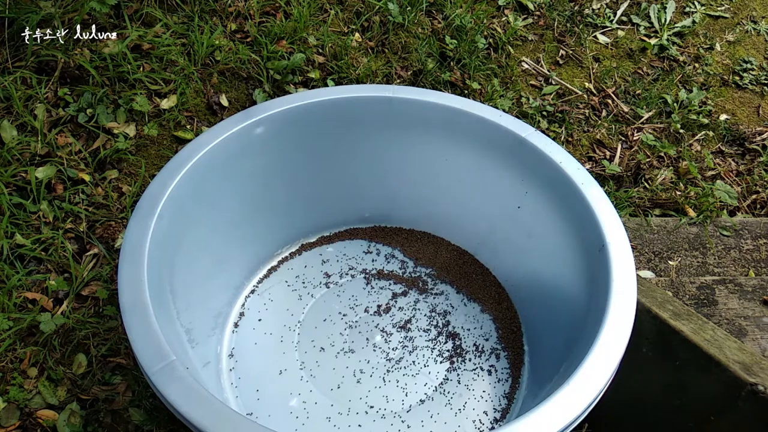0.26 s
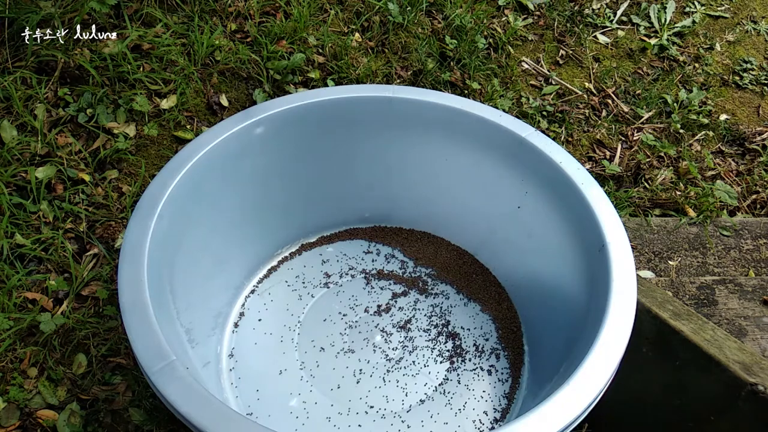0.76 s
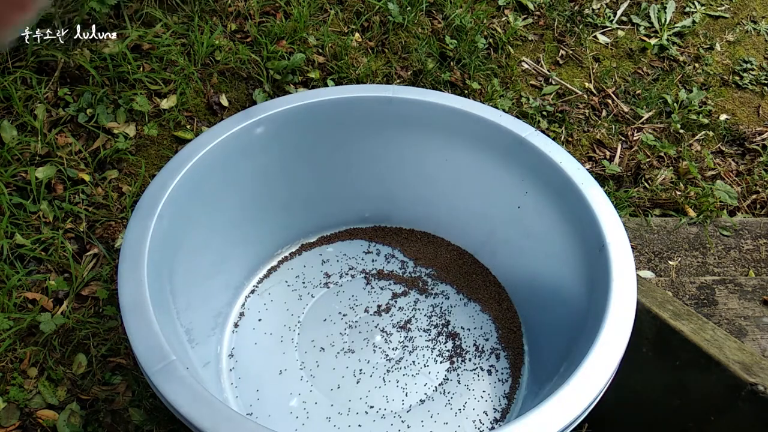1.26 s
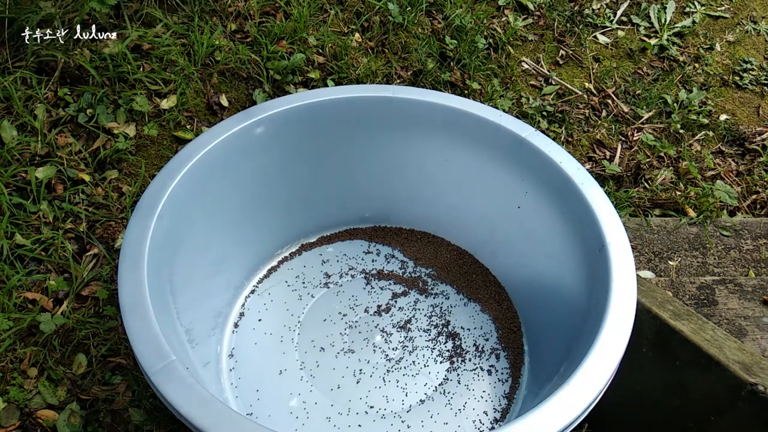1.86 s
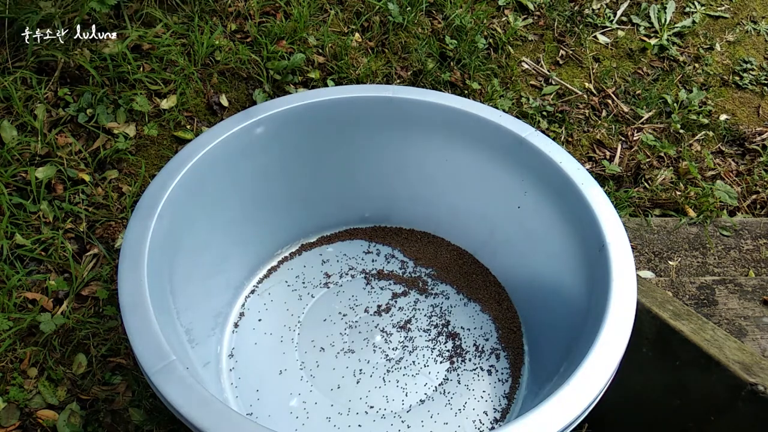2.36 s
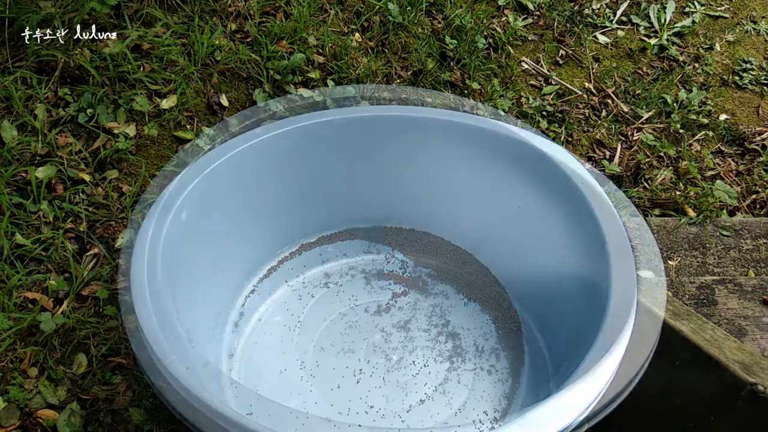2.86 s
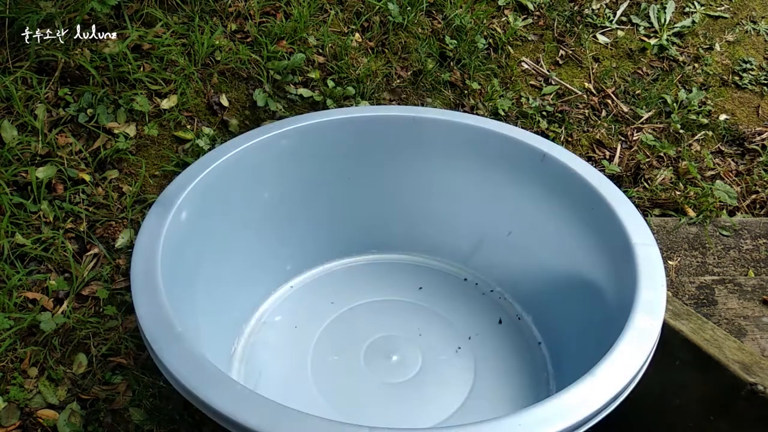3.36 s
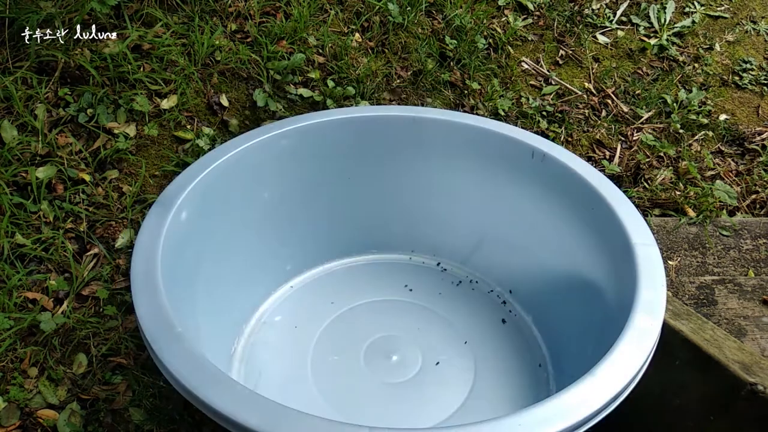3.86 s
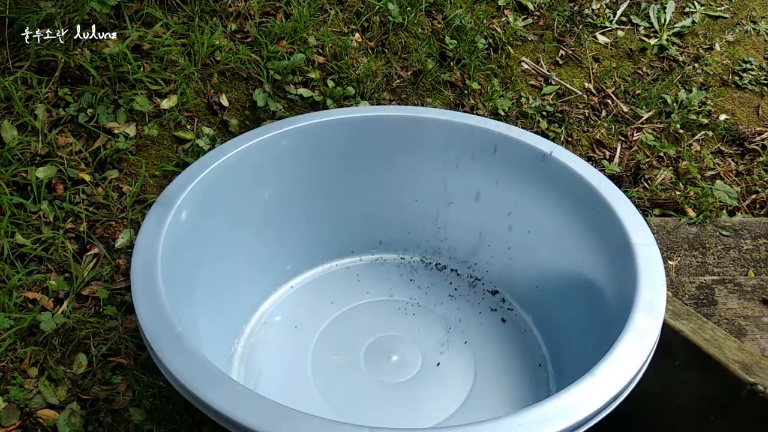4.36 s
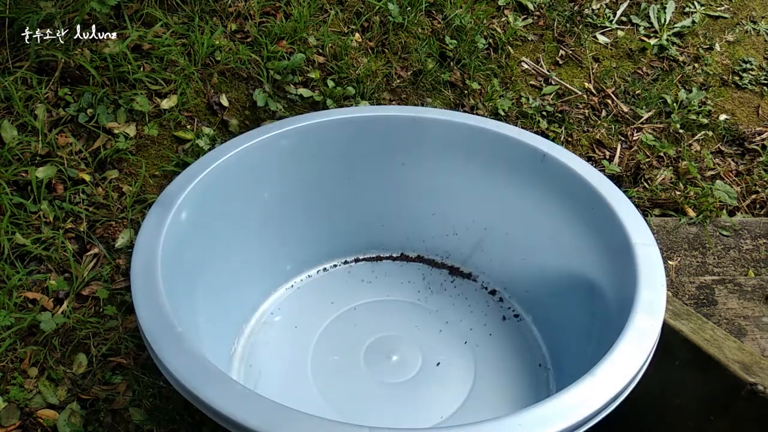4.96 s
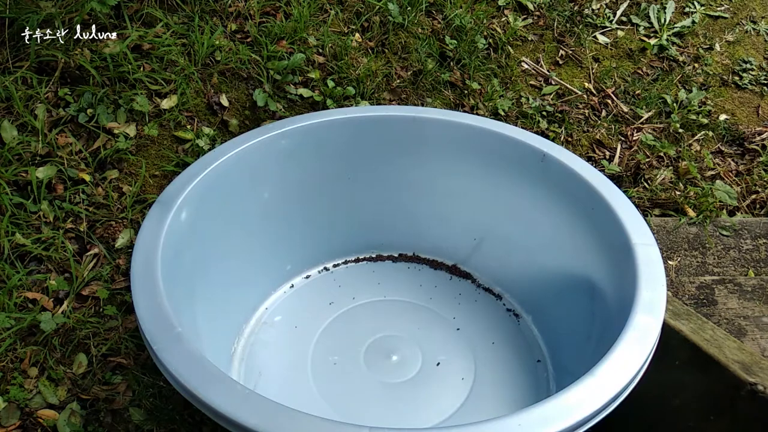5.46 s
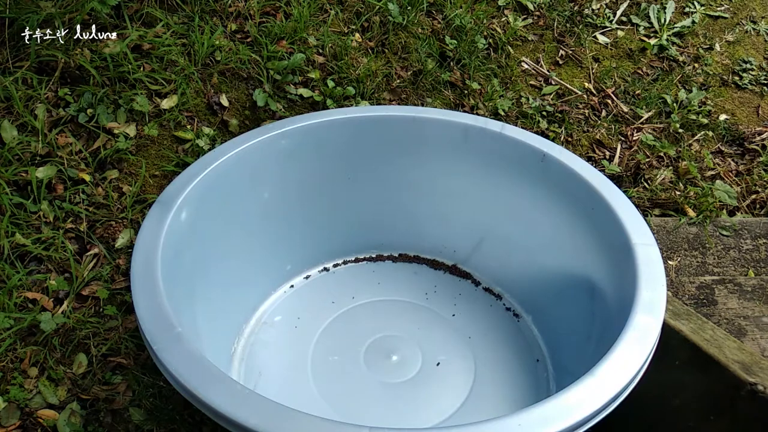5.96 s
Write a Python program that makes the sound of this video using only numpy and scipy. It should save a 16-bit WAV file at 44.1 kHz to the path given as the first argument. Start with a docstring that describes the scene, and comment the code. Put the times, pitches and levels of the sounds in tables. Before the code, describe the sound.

Outdoors, seeds patter thinly onto plastic, a tub is knocked sharply three times, and later seeds pour in rattling surges with light wind.

```python
"""From the start, small seeds pour and trickle from a tub into a plastic basin outdoors: impulses ringing its floor.
Distant rumble and hiss (coloured noise) lie behind throughout; a far bird whistles faintly in gliding sines.
Larger seeds soon tick singly, as short bands of noise; then the tub gets three hard knocks (wall modes, a crack,
a rattling tail), each led by a swish of its dry contents. Later a long pour surges as the tub is shaken,
while puffs of wind buffet the microphone, and a last pour follows."""
import sys
import numpy as np
from scipy import signal
from scipy.fft import rfft, irfft, next_fast_len
from scipy.io import wavfile

SR = 44100
rng = np.random.default_rng(int(sys.argv[2]) if len(sys.argv) > 2 else 0)


def wav_out(sig):
    """Save sig, one row per channel (or a flat mono array), as 16-bit PCM at SR to the path in sys.argv[1]."""
    wavfile.write(sys.argv[1], SR, np.round(np.clip(np.atleast_2d(sig).T, -1, 1) * 32767).astype(np.int16))


N = 273405
T = np.arange(N) / SR   # time in seconds

# In every table side_db is left minus right; spectra give relative levels.
# pours from the tub: start_s, rise_s, full_flow_s, stop_s, level_db
POURS = [(-.02, 0.017, 0.01, 0.33, -40.5), (1.198, 0.02, 0.024, 1.29, -37.5), (3.979, 0.37, 0.33, 5.5, -26),
         (5.69, 0.018, 0.081, 5.96, -42.5), (6.035, 0.019, 0.19, 6.75, -26.5)]
EBB_DB_PER_S, POUR_RELEASE_S = 23, 0.059   # a pour thins out as the tub empties, then stops
# shakes of the tub by hand, each a surge of the stream: middle_s, surge_db
SHAKES = [(4.17, 9), (4.315, 4.5), (4.467, 4.5), (4.638, 1.5), (4.805, 4), (4.969, 7), (5.086, 8),
          (5.164, 3.5), (5.247, 7.5)]
SHAKE_WIDTH_S = 0.033   # half-width
# thin trickle between the pours: time_s, level_db
TRICKLE = [(.49, -48), (.56, -55.5), (.78, -54.5), (.88, -52), (.95, -48.5), (1.15, -46), (1.2, -41.5),
           (1.45, -47.5), (1.52, -52), (1.68, -54.5), (2.02, -53), (2.22, -43.5), (2.52, -48.5), (3.1, -46),
           (3.45, -50), (3.8, -45), (5.6, -55.5)]
TRICKLE_LUMPS_DB, LUMPS_PER_S = 2, 20   # few seeds fall unevenly
# clumps of seeds landing together, before lead and skew are applied: middle_s, level_db, half_width_s
CLUMPS = [(0.01, -26, 0.018), (0.048, -34, 0.034), (0.081, -35.5, 0.016), (.13, -37.5, 0.012),
          (.18, -38, 0.012), (.213, -37.5, 0.036), (.265, -47, 0.005), (.305, -42, 0.039),
          (0.386, -40, 0.021), (0.517, -41.5, 0.01), (0.832, -42, 0.0099), (0.945, -44.5, 0.019),
          (1.011, -41.5, 0.012), (1.055, -48, 0.0095), (1.109, -46, 0.013), (1.241, -37, 0.017),
          (1.28, -35.5, 0.007), (1.359, -35.5, 0.024), (1.47, -40, 0.032), (1.533, -48, 0.0073),
          (1.617, -40, 0.026), (1.741, -36.5, 0.03), (1.93, -39, 0.039), (3.04, -38, 0.0069),
          (3.179, -39, 0.012), (3.336, -41, 0.015), (3.572, -46, 0.016), (3.841, -31, 0.013),
          (3.88, -30.5, 0.0086), (4.005, -28, 0.026), (4.051, -31, 0.012), (4.154, -26, 0.008),
          (4.323, -21, 0.009), (4.8, -22, 0.0041), (4.836, -25.5, 0.0097), (5.317, -36, 0.011),
          (5.41, -37.5, 0.0047), (5.441, -35.5, 0.013), (5.511, -40, 0.013), (5.574, -33.5, 0.0069),
          (5.672, -33, 0.0081), (5.925, -33, 0.031), (6.072, -22.5, 0.0059), (6.101, -21, 0.019)]
# where the seeds land; bare plastic is brighter than a bed of seeds: time_s, side_db, top_octave_db, body_db
LANDING = [(.05, 2, 4.5, -1.5), (.45, 3, 1, -1.5), (.9, 8.5, -33, -1.5), (1.14, -1.5, -6, 0.5),
           (1.4, -6.5, -13, -16), (1.75, -1, -27, -1), (2.8, 4.5, -22, -0.5), (3.1, -4, -6, -0.5),
           (3.85, -0.5, 0, -1.5), (4.45, 2, -7.5, -1), (5.1, 1.5, 3, -2), (6.15, 2, 1.5, -0.5)]
# colour of seeds on the basin: freq_hz, level_db
BASIN_COLOUR = [(40, -26), (100, 0), (200, -12), (310, 8), (490, -37), (820, -2), (1150, -5), (1600, -8.5),
                (2900, -6), (5200, -4.5), (7500, 1.5), (9400, 3.5), (12200, -1.5), (15500, -3.5)]
# stereo balance of the basin: freq_hz, side_db
BASIN_SIDE = [(700, -3), (1400, -1.5), (4500, -1.5), (7500, -6), (10000, 4), (15000, 4.5)]
SPOT_DWELL_S = .05      # the stream stays this long on one spot
BASIN_LAG_S = .0001     # the basin's ticks reach the right ear this much later
BASIN_RING_T60_S = 0.04
# correlation of the two ears in diffuse sound: freq_hz, likeness (0 to 1)
LIKENESS = [(40, 0.58), (130, 0.98), (290, 1), (640, 0.87), (1400, 0), (15000, 0)]
# level of the open air: time_s, rumble_db, hiss_db
AIR = [(0, -44.5, -52.5), (.7, -47.5, -55.5), (2, -45, -53.5), (2.848, -45, -57), (2.853, -43, -46),
       (4.5, -44, -47.5), (5.5, -46, -51.5), (6.2, -46.5, -51)]
# colour of the distant rumble: freq_hz, level_db
RUMBLE = [(15, -50), (25, -67), (48, -9.5), (81, -6), (124, 3), (147, 0.5), (200, -7), (223, -9),
          (316, -2.5), (358, -12.5), (700, -25.5), (950, -110)]
# colour of the hiss: freq_hz, level_db
HISS = [(260, -36), (450, 1.5), (538, -0.5), (588, 0), (758, -1.5), (1010, -2.5), (1570, -7), (4080, -8),
        (4590, -12.5), (7730, -5.5), (11100, -16.5), (15800, -16.5)]
# puffs of wind: middle_s, level_db
PUFFS = [(4.292, -35.5), (4.44, -31.5), (4.862, -33), (4.978, -45), (5.22, -40)]
PUFF_WIDTH_S = 0.051    # half-width
# colour of wind on the microphone: freq_hz, level_db
BUFFET = [(20, -35), (50, 3), (90, 11), (200, -14), (500, -13.5)]
EAR_LAG_S = .00041      # sound from the right reaches the left ear this much later
# whistles of a far bird: start_s, length_s, start_hz, end_hz, level_db
BIRD = [(.39, .17, 4400, 3750, -67), (2.22, .11, 4400, 3650, -58), (2.45, .06, 3750, 4100, -61.5),
        (2.58, .1, 4100, 3550, -65), (2.7, .14, 4350, 3500, -63.5)]
BIRD_FLUTTER_DB = 3
# single larger seeds striking bare plastic: start_s, level_db, pitch_hz, side_db
LARGE_SEEDS = [(.8935, -39, 8850, -6), (0.9953, -38.5, 4400, -4), (1.012, -36, 4320, -4),
               (1.1022, -31, 10600, 11), (1.225, -28.5, 8400, 2), (1.266, -27, 8400, -6),
               (1.385, -33.5, 8350, -7.5), (1.442, -36.5, 7500, -9), (1.5277, -35.5, 9100, -5),
               (1.736, -26.5, 9300, -2.5), (3.181, -39, 9500, 4), (3.558, -36, 9500, 4),
               (3.604, -41, 9500, 0), (3.81, -29, 9450, 3), (3.844, -24, 9800, 6), (3.978, -29, 9550, 4),
               (4.1303, -20, 9800, 2), (4.285, -23, 9700, 2), (4.404, -23.5, 8900, 2),
               (4.616, -17, 9500, 0), (4.7928, -15, 9700, 4), (4.993, -27, 9900, -1), (5.155, -28, 9250, 5),
               (5.185, -28, 9400, 4), (5.337, -38, 9300, -2), (5.441, -25, 9000, -2),
               (5.67, -28, 9600, 12.5), (5.939, -24.5, 9790, 3), (6.0595, -19, 9500, 7)]
# knocks on the tub: start_s, level_db, swish_db, swish_length_s, most_excited_pitch_hz, crack_db
KNOCKS = [(1.7958, -5.5, -12, 0.011, 621, 6.5), (2.0992, -6, -17.5, 0.012, 700, 5),
          (2.3252, -5.8, -19, 0.01, 1297, 5)]
# lighter contacts on the tub, rebounds and nudges: start_s, level_db, most_excited_pitch_hz, crack_db
BUMPS = [(1.8119, -9.6, 442, -5), (1.8176, -14.5, 301, -4), (1.8281, -18, 261, -7),
         (2.1152, -14.5, 604, -1), (2.1264, -23, 347, -5), (2.3356, -8.5, 679, 5), (2.3447, -12, 272, -6),
         (2.3558, -19, 205, -5), (4.176, -39, 298, -6), (4.313, -45, 300, -10), (4.442, -36, 700, 11)]
# colour of the swish of the contents: freq_hz, level_db
SWISH = [(300, 0.5), (1000, -18), (3400, -10), (4700, -6), (8000, -3.5), (11000, -13), (15500, -20)]
# vibration modes of the tub wall: freq_hz, level_db, side_db
TUB_MODES = [(104, -9.0, -1), (199, 3.5, 0), (237, -14.5, 0), (277, -7.5, 2), (322, -9.5, 2),
             (357, -19.5, 2), (455, -7.0, 13), (497, -11.0, 3), (540, -8.5, 5), (603, -6.0, 10),
             (645, -10.5, 2), (684, -11.0, 5), (750, -4.0, -1), (840, -8.0, -9), (898, -7.5, -11),
             (964, -12.0, -8), (1014, -11.5, -7), (1120, -11.5, -7), (1262, -16.5, -3), (1364, -16.0, -4),
             (1412, -12.0, -4), (1582, -18.5, 2), (1782, -16.5, 2), (2016, -13.0, 4), (2116, -14.0, 4),
             (2401, -18.0, 2), (2556, -16.0, -2), (3043, -21.5, 0)]
BUILD_CYCLES = 0.8      # a wall mode takes this long to reach full swing
# colour of the contact itself: freq_hz, level_db
CRACK = [(40, -40), (150, -8), (500, -7.5), (1050, -2), (1500, -18.5), (2200, -13), (3200, -13.5),
         (4200, -21), (8000, -22), (15500, -32)]
# colour of the diffuse ring after the contact: freq_hz, level_db
TAIL = [(40, -25), (170, -1), (500, -3), (900, -1.5), (1400, -11), (2300, -13.5), (3500, -16.5),
        (8000, -24.5), (11000, -26), (15500, -40)]
# stereo balance of that ring: freq_hz, side_db
TAIL_SIDE = [(200, 0), (330, -1.5), (600, 1), (1300, -1.5), (2400, -1.5)]
CUTOFF_HZ = 15900


def from_db(db):
    """Logarithmic level: decibels to amplitude gain."""
    return 10 ** (np.asarray(db) / 20)


def rms_one(x):
    """Normalization: scale to unit mean power."""
    return x / np.sqrt(np.mean(x ** 2) + 1e-20)


def in_time(rows):
    """Linear interpolation: the columns of a time curve at every sample."""
    time_s, *columns = np.transpose(rows)
    return [np.interp(T, time_s, column) for column in columns]


def at_hz(points, hz):
    """Logarithmic pitch scale: interpolate a spectrum along log frequency."""
    freq_hz, value = np.transpose(points)
    return np.interp(np.log(hz + 1), np.log(freq_hz), value)


def panned(side_db):
    """Interaural level difference: gains for left and right, half the difference each."""
    return from_db(np.array([[.5], [-.5]]) * side_db)


def delayed(x, lag_s):
    """Propagation delay: the same sound a little later."""
    return np.interp(T[:len(x)] - lag_s, T[:len(x)], x, left=0)


def from_right(ears, lag_s):
    """Interaural time difference: a sound from the right reaches the left ear later."""
    return np.array([delayed(ears[0], lag_s), ears[1]])


def drift(rate_hz):
    """Random modulation: chance values joined by lines, with spread 1."""
    return rms_one(np.interp(T * rate_hz, np.arange(4096), rng.standard_normal(4096)))


def dying(t60_s, size):
    """Exponential decay: a fall of 60 dB in t60_s."""
    return from_db(-60 * T[:size] / t60_s)


def noise(spectrum, size=N, likeness=None, side=None):
    """Spectral shaping: stereo noise of a given colour and interaural correlation, rms 1."""
    n = next_fast_len(size)
    hz = np.arange(n // 2 + 1) * SR / n
    shared, opposed = rfft(rng.standard_normal((2, n)))
    alike = 0 if likeness is None else np.clip(at_hz(likeness, hz), -1, 1)
    ears = np.sqrt(1 + alike) * shared + np.sqrt(1 - alike) * opposed * [[1], [-1]]
    ears = ears * from_db(at_hz(spectrum, hz))
    if side is not None:
        ears = ears * panned(at_hz(side, hz))
    return rms_one(irfft(ears, n)[:, :size])


def uneven(spectrum, uneven_db, count=160):
    """Irregular resonance: a spectrum with chance peaks and dips a few percent wide."""
    hz = np.geomspace(40, 16000, count)
    return np.column_stack([hz, at_hz(spectrum, hz) + uneven_db * rng.standard_normal(count)])


def add(out, start_s, sound):
    """Superposition: mix a sound in at a time."""
    i = round(start_s * SR)
    out[..., max(i, 0):i + sound.shape[-1]] += sound[..., max(-i, 0):N - i]


def pour_flow():
    """Granular flow: each pour swells, runs full, ebbs and stops; shakes make it surge."""
    flow = np.zeros(N)
    for start_s, rise_s, full_s, stop_s, level_db in POURS:
        swell = np.clip((T - start_s) / rise_s, 0, 1)
        ebb_db = EBB_DB_PER_S * np.maximum(T - start_s - rise_s - full_s, 0)
        release = np.exp(-np.maximum(T - stop_s, 0) / POUR_RELEASE_S)
        flow += swell * from_db(level_db - ebb_db) * release
    surge_db = sum(db * np.exp(-np.abs((T - s) / SHAKE_WIDTH_S) ** 3) for s, db in SHAKES)
    return flow * from_db(surge_db)


def seed_power(lead_s=0.0025, rise=0.99, fall=0.7, surge_db=1.5):
    """Addition of powers: uneven stream and trickle, plus clumps that arrive abruptly and bounce to rest."""
    trickle = from_db(in_time(TRICKLE)[0] + TRICKLE_LUMPS_DB * drift(LUMPS_PER_S))
    stream = pour_flow() * from_db(surge_db * drift(55))
    power = stream ** 2 + trickle ** 2
    t = T[:SR // 4] - T[SR // 8]   # time from the middle of a clump
    for middle_s, level_db, width_s in CLUMPS:
        arrival = (t / (rise * width_s)) ** 4
        settling = (t / (fall * width_s)) ** 2
        shape = np.exp(-np.where(t < 0, arrival, settling))
        add(power, middle_s + t[0] - lead_s, from_db(level_db) ** 2 * shape)
    return power


def basin_response(tick_t60_s=0.0012, ring_db=-9.0, size=2048):
    """Impulse response of one spot: a dry tick, left ear first, then decaying noise for many close modes."""
    colour = uneven(BASIN_COLOUR, uneven_db=5.0)
    tick = noise(colour, size=size, likeness=[(40, 1), (16000, 1)], side=BASIN_SIDE)
    tick = tick * dying(tick_t60_s, size)
    tick = np.array([tick[0], delayed(tick[1], BASIN_LAG_S)])
    ring = noise(colour, size=size, likeness=LIKENESS, side=BASIN_SIDE) * dying(BASIN_RING_T60_S, size)
    return rms_one(tick + from_db(ring_db) * ring) / np.sqrt(size)


def seeds(full_per_s=3000, full_db=-27, size_db=1.0, stray_share=.25, spots=19):
    """Shot noise: random impacts, more of them at higher level, convolved with the spot each one strikes."""
    power = seed_power()
    per_s = full_per_s * (np.sqrt(power) / from_db(full_db)) ** .5
    per_s = np.clip(per_s, 50, SR / 2)
    sizes = rms_one(from_db(size_db * np.minimum(rng.exponential(1, N), 4)))
    sizes = sizes * rng.choice([-1, 1], N)
    impacts = (rng.random(N) < per_s / SR) * sizes * np.sqrt(power * SR / per_s)
    # the stream visits one spot after another; strays land anywhere
    stray = rng.random(N) < stray_share
    spot = np.where(stray, rng.integers(0, spots, N), np.floor(T / SPOT_DWELL_S) % spots)
    out = np.zeros((2, N))
    for k in range(spots):
        out += signal.oaconvolve((impacts * (spot == k))[None], basin_response(), axes=1)[:, :N]
    # bare plastic gives a brighter tick than a bed of seeds
    side_db, top_db, body_db = in_time(LANDING)
    body = signal.sosfilt(signal.butter(1, 3000, fs=SR, output="sos"), out)
    out = out + (from_db(body_db) - 1) * body
    dull = signal.sosfilt(signal.butter(2, 10000, fs=SR, output="sos"), out)
    top = signal.sosfilt(signal.butter(2, 11500, "high", fs=SR, output="sos"), out)
    return (dull - from_db(top_db) * top) * panned(side_db)   # minus: second-order bands oppose in phase


def outdoors(lumps_db=1.5, sway_db=1.5, hiss_side_db=-4.0):
    """Diffuse field and turbulence: correlated rumble and hiss; wind buffets each microphone port on its own."""
    rumble_db, hiss_db = in_time(AIR)
    rumble = from_db(rumble_db + sway_db * drift(12)) * noise(RUMBLE, likeness=LIKENESS)
    hiss = from_db(hiss_db) * noise(HISS, likeness=LIKENESS) * panned(hiss_side_db)
    gust = sum(from_db(db) / (1 + ((T - s) / PUFF_WIDTH_S) ** 2) for s, db in PUFFS)
    gust = gust * from_db(lumps_db * drift(25))
    return from_right(rumble + hiss, EAR_LAG_S) + gust * noise(BUFFET) * panned(-9.0)


def bird(waver_hz=50):
    """Frequency modulation: thin gliding sines, far to the right and broken up on the way."""
    out, waver = np.zeros(N), waver_hz * drift(240)
    for start_s, length_s, start_hz, end_hz, level_db in BIRD:
        u = np.linspace(0, 1, int(length_s * SR))
        hz = start_hz + (end_hz - start_hz) * u + waver[int(start_s * SR):][:len(u)]
        whistle = np.sin(np.pi * u) * np.sin(2 * np.pi * np.cumsum(hz) / SR)
        add(out, start_s, from_db(level_db) * whistle)
    return out * from_db(BIRD_FLUTTER_DB * drift(110)) * panned(-10)


def single_seeds(tick_t60_s=0.0045, ring_t60_s=0.081, ring_db=-4.0, skirt_db=-23.5, strike_db=-3.0, size=4096):
    """Damped resonance: a larger seed gives a sharp tick and a short ring around one pitch."""
    out = np.zeros((2, N))
    ring = from_db(ring_db) * dying(ring_t60_s, size)
    envelope = from_db(strike_db) * (dying(tick_t60_s, size) + ring)
    for start_s, level_db, pitch_hz, side_db in LARGE_SEEDS:
        peak = [(pitch_hz / 2, skirt_db), (pitch_hz, 0), (pitch_hz * 2, 2 * skirt_db)]
        tick = noise(uneven(peak, uneven_db=6.0), size=size) * envelope
        add(out, start_s, from_db(level_db) * tick * panned(side_db))
    return out


def blow(pitch_hz, crack_db, favour_db=5.5, wall_db=-8.0, wall_t60_s=0.099, crack_t60_s=0.016,
         tail_db=-9.5, tail_t60_s=0.23, scatter_db=0.5, rattle_db=2.0, size=16384):
    """Modal synthesis of one contact: wall modes favoured near one pitch, a short crack and a rattling tail."""
    hz, level_db, side_db = np.transpose(TUB_MODES)[:, :, None]
    near = np.exp(-2 * np.log2(hz / pitch_hz) ** 2)
    scatter = scatter_db * rng.standard_normal(hz.shape)
    gains = from_db(level_db + wall_db + favour_db * near + scatter)
    # the plastic gives a little, so low modes build up more slowly
    build = np.minimum(hz * T[:size] / BUILD_CYCLES, 1)
    modes = gains * build * dying(wall_t60_s, size) * np.cos(2 * np.pi * hz * T[:size])
    signs = (-1) ** np.arange(len(hz))   # neighbouring modes alternate in polarity
    wall = panned(side_db[:, 0]) * signs @ modes
    crack = from_db(crack_db) * noise(CRACK, size=size)[0] * dying(crack_t60_s, size)
    tail = noise(uneven(TAIL, uneven_db=2.5), size=size, likeness=LIKENESS, side=TAIL_SIDE)
    tail = from_db(tail_db) * tail * dying(tail_t60_s, size)
    tail = tail * from_db(rattle_db * drift(168)[:size])   # the contents rattle as they settle
    return from_right(wall + crack + tail, EAR_LAG_S)


def knocks(swish_side_db=-6.5, swell_db=15.0, lowest_hz=75, size=2048):
    """Impact and radiation: contents swish up to each knock, lighter bumps; a small tub radiates no deep bass."""
    out = np.zeros((2, N))
    for start_s, level_db, swish_db, length_s, pitch_hz, crack_db in KNOCKS:
        before_s = T[:size][::-1]   # time left until the knock
        swell = from_db(swish_db - swell_db * (before_s / length_s) ** 2)
        add(out, start_s - size / SR, noise(SWISH, size=size) * swell * panned(swish_side_db))
        add(out, start_s, from_db(level_db) * blow(pitch_hz, crack_db))
    for start_s, level_db, pitch_hz, crack_db in BUMPS:
        add(out, start_s, from_db(level_db) * blow(pitch_hz, crack_db))
    return signal.sosfilt(signal.butter(1, lowest_hz, "high", fs=SR, output="sos"), out)


def scene():
    """Superposition of everything heard at the basin."""
    return seeds() + outdoors() + bird() + single_seeds() + knocks()


def record(dry):
    """Saturation and band limiting: the loudest peaks are rounded and the top is cut."""
    rounded = 1.112 * np.tanh(dry / 1.13)
    return signal.sosfilt(signal.ellip(12, .1, 70, CUTOFF_HZ, fs=SR, output="sos"), rounded)


dry = scene()
out = record(dry)
wav_out(out)
```